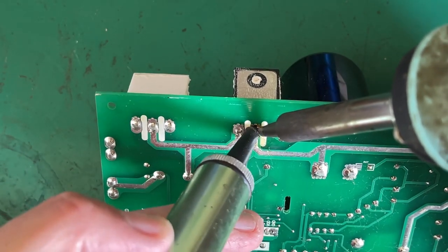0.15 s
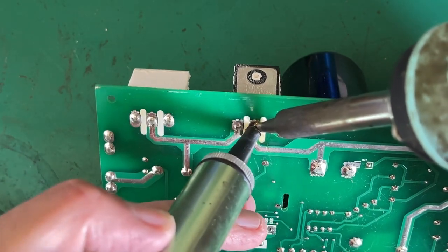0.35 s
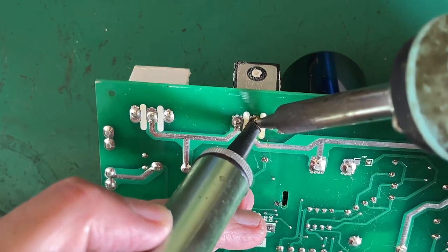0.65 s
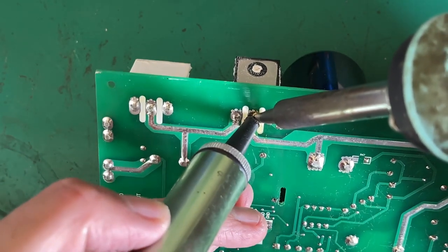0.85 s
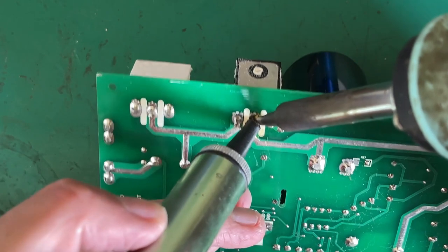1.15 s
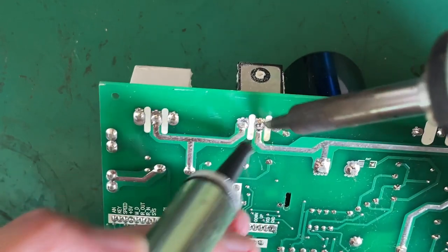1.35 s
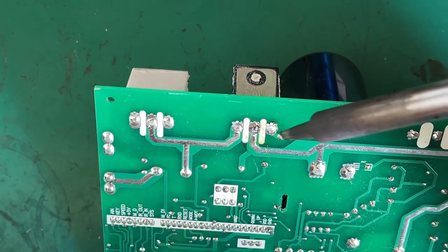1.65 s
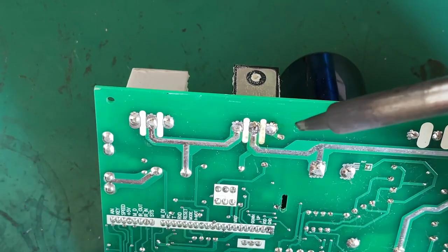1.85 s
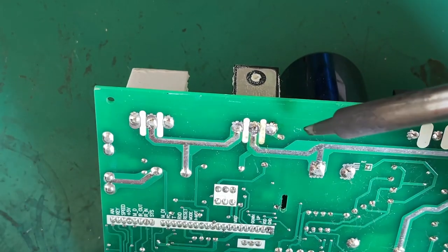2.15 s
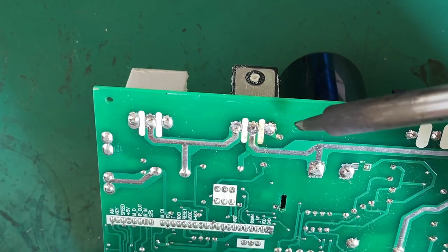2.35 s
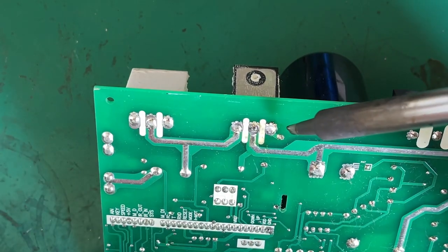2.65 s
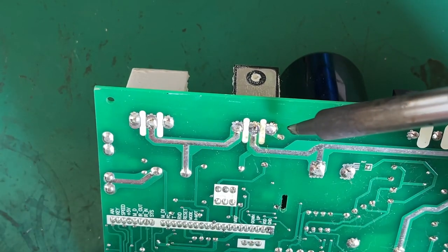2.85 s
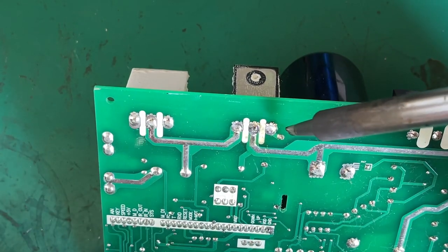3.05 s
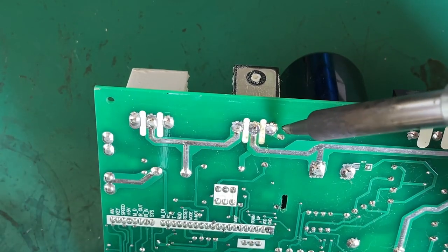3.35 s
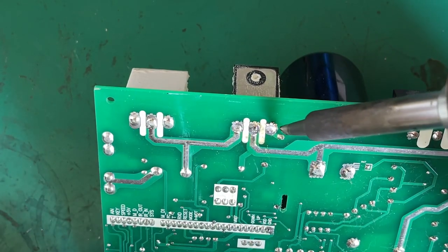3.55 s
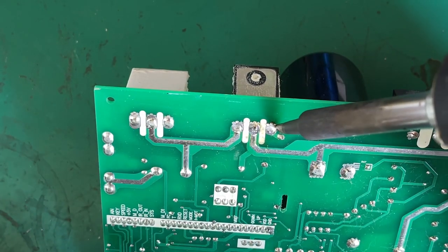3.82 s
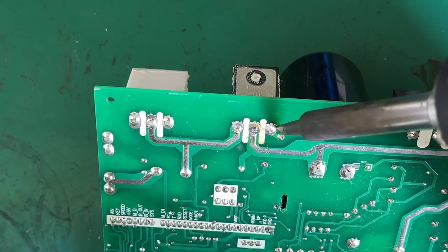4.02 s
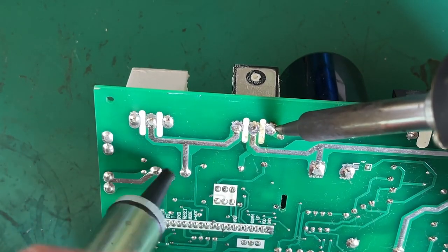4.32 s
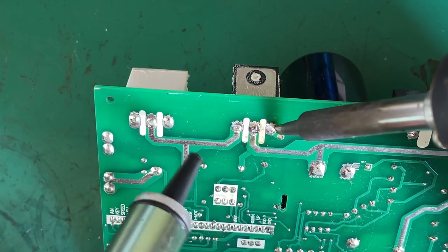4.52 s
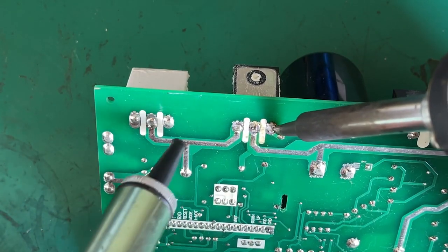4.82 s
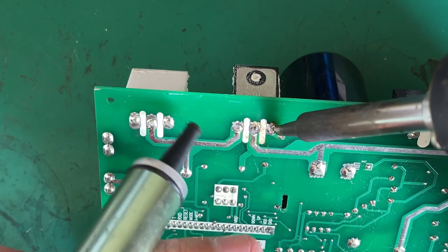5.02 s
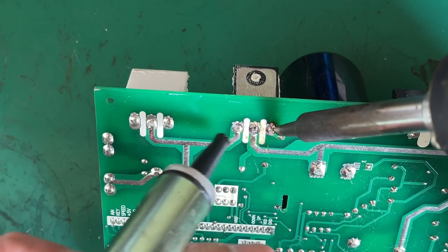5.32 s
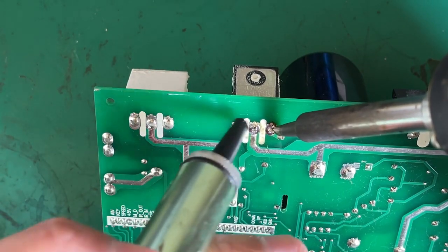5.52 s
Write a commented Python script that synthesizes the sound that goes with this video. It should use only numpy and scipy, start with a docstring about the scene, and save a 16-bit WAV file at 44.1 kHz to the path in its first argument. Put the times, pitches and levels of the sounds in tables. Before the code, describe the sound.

A spring-loaded desoldering pump snaps and thumps a circuit board, then is re-cocked with two sharp clicks over a faint fan hum.

```python
"""Desoldering at a workbench, close up, with a fan humming faintly throughout and a small room answering.
First the board knocks; then come thin squeaks, sizzling flux, a hand stirring the bench and light ticks.
A spring-loaded pump fires, its recoil thumps the board, and the board knocks down as the pump lifts off.
The plunger slides back in and latches with two clicks; later a hand bumps the board again.
Knocks and clicks are struck resonances that die away; slides, sizzle and fan rush are coloured noise."""
import sys
import numpy as np
from scipy import signal
from scipy.fft import rfft, irfft, next_fast_len
from scipy.io import wavfile
from scipy.ndimage import uniform_filter1d, map_coordinates

SR = 44100
rng = np.random.default_rng(int(sys.argv[2]) if len(sys.argv) > 2 else 0)


def wav_record(signal):
    """Record a signal, one row per channel, as 16-bit PCM in the file named by sys.argv[1]."""
    frames = np.transpose(np.atleast_2d(signal))
    bounded = np.clip(frames, -1, 1)
    # unit amplitude maps onto the largest positive 16-bit level
    quanta = np.round(bounded * 32767).astype(np.int16)
    wavfile.write(sys.argv[1], SR, quanta)


N = 250488
T = np.arange(N) / SR  # time through the whole scene, s
AGE = np.arange(SR // 2) / SR  # time since a blow, s
BOOM_HZ = 112  # bench top
STOP_S = .929  # the piston hits its rubber stop


def amp(db):
    """Turn decibels into gain."""
    return 10 ** (np.asarray(db) / 20)


def unit(x):
    """Scale a signal to rms 1."""
    return x / np.sqrt(np.mean(x ** 2) + 1e-20)


def along(points, hz):
    """Read between (Hz, value) points on a log frequency axis."""
    f, v = np.transpose(points)
    return np.interp(np.log(hz + 1), np.log(f), v)


def fade(t, t60):
    """Die away exponentially, losing 60 dB in t60 seconds."""
    return np.exp(-np.log(1000) * t / t60)


def filtered(x, response):
    """Multiply the spectrum of x by a response, given as a function of frequency."""
    m = next_fast_len(len(x) + SR // 4)
    spectrum = rfft(x, m) * response(np.fft.rfftfreq(m, 1 / SR))
    return irfft(spectrum, m)[:len(x)]


def noise(spectrum):
    """Make noise of rms 1, coloured by (Hz, dB) points."""
    white = rng.standard_normal(N)
    return unit(filtered(white, lambda hz: amp(along(spectrum, hz))))


def bell(f, hz, octaves):
    """Draw a smooth hump of height 1 on a log frequency axis."""
    return np.exp(-.5 * (np.log2((f + 1) / hz) / octaves) ** 2)


def band(hz, octaves):
    """Make noise of rms 1 around one frequency."""
    return unit(filtered(rng.standard_normal(N), lambda f: bell(f, hz, octaves)))


def wobble(rate):
    """Draw a smooth random curve through `rate` random points a second."""
    points = rng.standard_normal(int(N * rate / SR) + 4)
    return map_coordinates(points, [T * rate])


def swell(start, end):
    """Raise a level quickly after one time and let it ebb more slowly until another."""
    u = np.clip((T - start) / (end - start), 0, 1)
    return np.sqrt(np.abs(np.sin(np.pi * u ** 0.52)))


def add(track, s, sound):
    """Mix a sound in at time s."""
    start = max(round(s * SR), 0)
    track[start:start + len(sound)] += sound[:N - start]


def ring(modes, scatter_db, rough):
    """Sound fading sine waves, each at a slightly random strength; loose contact makes their phases wander."""
    out = np.zeros(len(AGE))
    for hz, t60, db in modes:
        strength = amp(db + scatter_db * rng.standard_normal())
        steps = uniform_filter1d(rng.standard_normal(len(AGE)), size=64)
        drift = rough * np.cumsum(steps) / np.sqrt(SR / 100)  # rough: radians per 10 ms
        out += strength * fade(AGE, t60) * np.sin(2 * np.pi * hz * AGE + drift)
    return out


def in_room(sound, wet_db):
    """Add near reflections and a spread-out tail whose pitches die away at different speeds."""
    # near reflections: delay/s, level/dB
    walls = [(0.0104, -18.5), (0.0229, -23.5)]
    # how long the room rings on: f/Hz, t60/s
    room_decay = [(120, .3), (500, 0.3), (1200, 0.19), (2500, .15), (8000, .145), (14000, .14)]
    hz, t, z = signal.stft(rng.standard_normal(len(AGE)), SR, nperseg=256)
    faded = z * fade(t, along(room_decay, hz)[:, None])
    tail = signal.istft(faded, SR, nperseg=256)[1][:len(AGE)]
    tail = tail * (1 - np.exp(-AGE / 0.0013))  # the tail builds up softly
    answer = amp(wet_db) * tail / np.linalg.norm(tail)
    answer[0] += 1  # the direct sound
    for delay, db in walls:
        answer[round(delay * SR)] += amp(db)
    return signal.fftconvolve(sound, answer)


def background(fan_db=-66.0, hiss_db=-80.5):
    """A fan's soft rush is coloured noise and its tones are wavering sines, with faint hiss above."""
    # colour of the fan's rush: f/Hz, relative level/dB per Hz
    fan_colour = [(15, -25.5), (30, -6), (60, -1), (140, -9.5), (230, -12), (300, -3), (390, -5.5),
                  (470, -11.5), (800, -16), (1050, -15.5), (1380, -25.5), (1480, -38.5), (2500, -61.5)]
    # colour of the hiss: f/Hz, relative level/dB per Hz
    hiss_colour = [(800, -25.5), (1500, -1), (2100, -5), (3600, -10.5), (4250, -21), (5000, -15),
                   (7000, -14.5), (8500, -17.5), (9800, -23.5), (15500, -32.5)]
    # fan tones: f/Hz, middle level/dB, random turning points per second
    fan_tones = [(294.6, -69, 9.9), (403, -85, 7.1), (998, -81, 12), (1345, -81.5, 17)]
    out = amp(fan_db + 0.27 * wobble(13)) * noise(fan_colour)
    out += amp(hiss_db + 0.28 * wobble(5.4)) * noise(hiss_colour)
    for hz, db, rate in fan_tones:
        level = amp(db + 2.6 * wobble(rate)) * np.sqrt(2)
        out += level * np.sin(2 * np.pi * hz * T + 1.5 * wobble(rate))
    return out


def knock(knock_db, contact_hz, metal_db, contact_db=12, octaves=0.28):
    """A blow makes the board clack in its own modes and its metal parts ring."""
    # the board's modes: f/Hz, t60/s, relative level/dB
    board = [(211.6, .15, -5.5), (301, 0.066, -4.5), (396.5, .08, -1.5), (480, 0.057, -2),
             (562.2, 0.05, -8.5), (700, 0.026, -6.5), (1130, 0.032, -9.5)]
    # metal parts on the board: f/Hz, t60/s, relative level/dB
    metal_parts = [(1897, 0.076, 2.5), (2000, 0.028, -7), (3240, 0.046, -17), (4560, .03, -26.5)]
    struck = []
    for hz, t60, db in board:
        # the length of the contact favours modes near one frequency
        favour_db = contact_db * (bell(hz, contact_hz, octaves) - 1)
        struck.append((hz, t60, db + favour_db))
    clack = amp(knock_db + 1) * ring(struck, scatter_db=2.5, rough=0.53)
    metal = amp(metal_db) * ring(metal_parts, scatter_db=3.5, rough=1.2)
    cushion = 1 - np.exp(-AGE / 0.0009)  # the rubber mat softens the attack
    return in_room(cushion * (clack + metal), wet_db=-11.0)


def knocks(flat_metal_db=-16, tremble_octaves=.9):
    """Each bump lands edge first, then flat, then hops; the bench top booms low and the board trembles on."""
    # the board tips onto the bench: t/s, relative edge level/dB, edge contact f/Hz, relative flat level/dB,
    # relative boom level/dB, boom t60/s, relative metal ring level/dB
    bumps = [(.012, -40, 430, -54, -43.5, 0.32, -85), (0.9134, -22, 699.8, -21.5, -17.5, 0.34, -42),
             (1.2953, -21, 700, -36, -26.5, 0.29, -57), (4.2785, -24.5, 520, -31, -23, .21, -35)]
    flat_s, flat_hz = .0098, 350  # flat landing: delay after the edge, contact frequency
    rebound_s, rebound_loss_db = .045, 23.5  # the board hops once
    boom_lag_s = 0.0073  # the bench top follows the edge
    tremble_top_db, tremble_t60_s, tremble_hz = -51.5, .75, 443
    out = np.zeros(N)
    hardest_db = max(edge_db for _, edge_db, *_ in bumps)
    for s, edge_db, edge_hz, flat_db, boom_db, boom_t60, metal_db in bumps:
        add(out, s, knock(edge_db, edge_hz, metal_db))
        add(out, s + flat_s, knock(flat_db, flat_hz, metal_db + flat_metal_db))
        add(out, s + rebound_s, amp(-rebound_loss_db) * knock(edge_db, edge_hz, metal_db))
        boom = np.sin(2 * np.pi * BOOM_HZ * AGE) * fade(AGE, boom_t60)
        boom *= 1 - np.exp(-AGE / 0.0098)  # the boom swells in
        add(out, s + boom_lag_s, amp(boom_db + 1) * boom)
        # harder bumps tremble more
        tremble_db = tremble_top_db + max(edge_db, flat_db) - hardest_db
        tremble = fade(T, tremble_t60_s) * band(tremble_hz, tremble_octaves)
        add(out, s, amp(tremble_db) * tremble)
    return out


def squeaks(rough=0.69):
    """Thin squeaks and whistles: gliding sine waves with a rough, wandering phase."""
    # faint squeaks: start t/s, end t/s, from f/Hz, to f/Hz, level/dB
    glides = [(0.136, 0.176, 1790, 1700, -70), (4.12, 4.419, 3370, 3153, -86.5),
              (5.035, 5.107, 8100, 8000, -75.5), (5.097, 5.37, 3400, 2380, -84.5)]
    out = np.zeros(N)
    for start, end, from_hz, to_hz, db in glides:
        pitch_hz = np.interp(T, [start, end], [from_hz, to_hz])
        phase = 2 * np.pi * np.cumsum(pitch_hz) / SR + rough * np.pi * wobble(150)
        out += amp(db) * swell(start, end) * np.sqrt(2) * np.sin(phase)
    return out


def strokes(rows):
    """Add up the swelling levels of (start, end, dB) rows."""
    return sum(amp(db) * swell(start, end) for start, end, db in rows)


def sizzles(grain_db=1.5):
    """Flux sizzles under the iron: coloured noise with a fast, grainy level."""
    # sizzles: start t/s, end t/s, level/dB before the grain
    spells = [(.253, .555, -83.5), (1.34, 1.53, -76), (1.62, 2.02, -79.5), (5.262, 5.42, -85)]
    # colour of the sizzle: f/Hz, relative level/dB per Hz
    flux_colour = [(1200, -21), (2600, 1.5), (4200, -12.5), (5500, -6.5), (8200, -4.5), (10500, -15.5),
                   (15000, -27.5)]
    return strokes(spells) * noise(flux_colour) * amp(grain_db * wobble(76))


def nudges(bench_octaves=0.24):
    """The hand leans on the board and stirs the bench top: a low band of noise around its boom."""
    # leaning hand: start t/s, end t/s, level/dB
    leans = [(.293, .424, -62), (1.131, 1.285, -56)]
    return strokes(leans) * band(BOOM_HZ, bench_octaves)


def barrel(f, body_db, cutoff_hz=1350):
    """The pump's resonances, too small to radiate bass, join the hollow knock of its body."""
    # the pump's barrel: f/Hz, width/Hz, relative level/dB
    barrel_modes = [(1530, 190, -3.5), (1980, 360, -3), (2438, 300, 0), (2980, 380, -2), (3674, 380, -2.5),
                    (4810, 350, -3.5), (5540, 780, -5), (5930, 120, 1), (6430, 310, -5), (7540, 570, -3.5),
                    (8560, 490, -1), (9730, 630, -9.5), (10400, 570, -12.5), (12000, 900, -21),
                    (13600, 1700, -26.5)]

    def resonance(hz, width):
        """Respond most strongly at hz, within about `width` Hz."""
        return 1j * f * width / (hz * hz - f * f + 1j * f * width)

    tube = 0
    for k, (hz, width, db) in enumerate(barrel_modes):
        tube = tube + (-1) ** k * amp(db) * resonance(hz, width)  # neighbours take opposite signs
    high_pass = 1j * f / cutoff_hz * resonance(cutoff_hz, cutoff_hz)
    return tube * high_pass ** 2 + amp(body_db) * resonance(650, 600)


def click(db, bright_hz, emphasis_db, body_db, spring_db, octaves=0.36, soft_hz=13000):
    """One sharp blow and a few milliseconds of chatter ring the barrel and the spring."""
    # the spring's modes: f/Hz, t60/s, relative level/dB
    spring_modes = [(3290, 0.14, -1.5), (4820, .09, -2.5), (5400, .11, -1.5), (7100, 0.096, 1),
                    (7360, 0.14, -5.5), (9530, 0.11, 1.5), (11876, .07, -14.5)]
    chatter, chatter_t60_s = .16, .0125  # the rattle in a contact: strength against the blow, decay
    force = chatter * rng.standard_normal(len(AGE)) * fade(AGE, chatter_t60_s)
    force *= 1 - np.exp(-AGE / 0.00082)
    force[0] += 1  # the blow itself

    def colour(f):
        """Favour the resonances near where the blow lands; plastic softens the very top."""
        return amp(emphasis_db * bell(f, bright_hz, octaves)) / np.sqrt(1 + (f / soft_hz) ** 16)

    blow = filtered(force, lambda f: barrel(f, body_db) * colour(f))
    blow = blow / np.linalg.norm(blow)  # equal energy before the level is set
    blow += amp(spring_db - 18.5) * ring(spring_modes, scatter_db=3.5, rough=4.0)
    return in_room(amp(db + 11) * blow, wet_db=-11)


def clicks():
    """The pump's hard contacts: light ticks, snaps, the piston bouncing on its stop and the button."""
    # light touches of nozzle and plunger: t/s, relative level/dB
    ticks = [(.358, -56), (.393, -56.5), (1.966, -46.5), (1.987, -55), (2.626, -54), (2.648, -44),
             (4.2782, -46)]
    # the trigger lets go, the nozzle slips off the joint, the plunger latches, the button springs back:
    # t/s, relative level/dB, brightest f/Hz, emphasis/dB, hollow body level/dB, relative spring level/dB
    snaps = [(.9101, -12.7, 7900, 8.5, -3, -36.5), (1.2984, -30, 6600, 4.5, -9, -23),
             (2.8337, -7.5, 2860, 6, -14.5, -34), (2.9834, -19.5, 5000, 11, -4.5, -21)]
    stop_db, stop_hz = -13, 1930  # relative level and brightest frequency at the stop
    bounce_s, bounce_loss_db = .0115, 6.5  # the piston bounces once
    out = np.zeros(N)
    for s, db in ticks:
        add(out, s, click(db, bright_hz=5600, emphasis_db=1.5, body_db=-7, spring_db=-33, soft_hz=7460))
    for s, db, bright_hz, emphasis_db, body_db, spring_db in snaps:
        add(out, s, click(db, bright_hz, emphasis_db, body_db, spring_db))
    for k in range(2):
        hit = click(stop_db - k * bounce_loss_db, stop_hz, emphasis_db=18, body_db=-1, spring_db=-35)
        add(out, STOP_S + k * bounce_s, hit)
    # dull knock of the button just before its snap
    add(out, 2.981, click(-37.5, bright_hz=940, emphasis_db=16, body_db=17, spring_db=-41))
    return out


def slides(grain_db=3.4, uneven_db=2.6, edge_s=0.0049):
    """Piston and plunger slide in the barrel: friction noise with a grainy, uneven level."""
    # slides: start t/s, end t/s, level/dB before grain and room
    rubs = [(.911, .927, -37.5), (2.53, 2.565, -75), (2.648, 2.825, -69.5), (2.96, 2.98, -72),
            (3.33, 3.365, -79)]
    # colour of the rubbing: f/Hz, relative level/dB per Hz
    rub_colour = [(700, -31), (1600, -11), (2700, -3.5), (3700, -11), (4300, -12), (5500, -2), (8000, -4),
                  (9200, -6.5), (10500, -20.5), (15000, -35)]
    level = np.zeros(N)
    for start, end, db in rubs:
        rise = np.clip((T - start) / edge_s, 0, 1)
        fall = np.clip((end - T) / edge_s + 1, 0, 1)
        level += amp(db) * rise * fall
    friction = amp(grain_db * wobble(400) + uneven_db * wobble(45)) * noise(rub_colour)
    return in_room(level * friction, wet_db=-4)[:N]


def recoil():
    """The pump's kick heaves the bench once: a low, quickly damped sine wave."""
    start_s, level_db, heave_hz, t60_s = .912, -32, 72, .1
    out = np.zeros(N)
    heave = np.sin(2 * np.pi * heave_hz * AGE) * fade(AGE, t60_s)
    add(out, start_s, amp(level_db) * heave)
    return out


def shiver(octaves=1.1):
    """The released spring's coils rustle on in the barrel after the piston stops: a fading band of noise."""
    level_db, t60_s, rustle_hz = -67.5, 1.6, 2700
    out = np.zeros(N)
    add(out, STOP_S, amp(level_db) * fade(T, t60_s) * band(rustle_hz, octaves))
    return out


def scene():
    """Mix fan, board, hand, flux and pump into one channel."""
    bench = background() + knocks() + squeaks() + sizzles() + nudges()
    pump = clicks() + slides() + recoil() + shiver()
    return (bench + pump)[None]


def record(dry):
    """Keep only what lies below the band limit."""
    top_hz = 15700
    return np.array([filtered(channel, lambda hz: hz < top_hz) for channel in dry])


dry = scene()
out = record(dry)
wav_record(out)
```